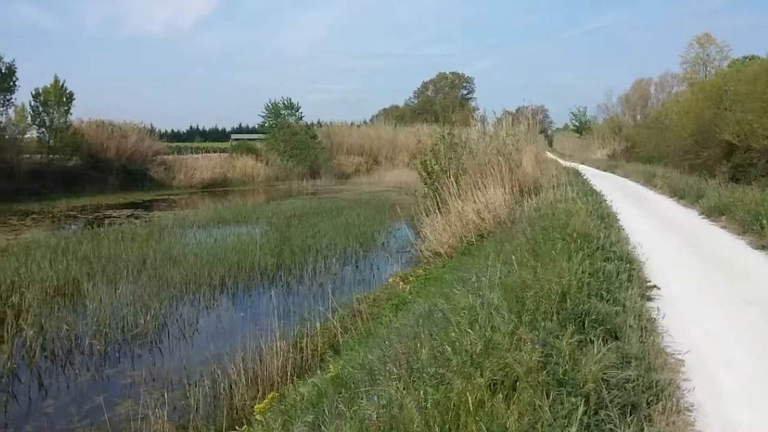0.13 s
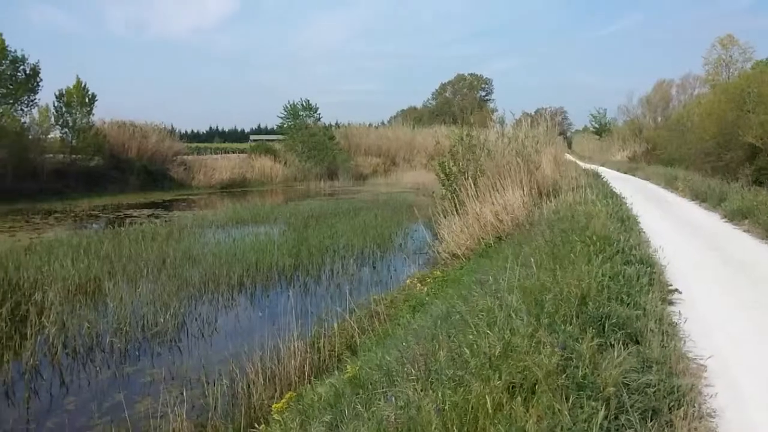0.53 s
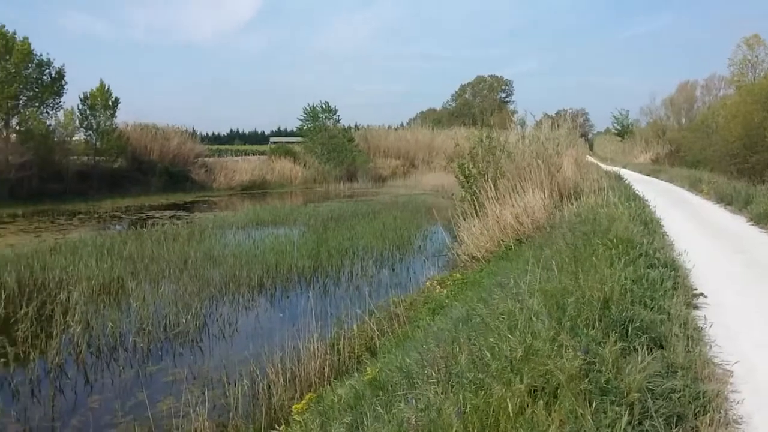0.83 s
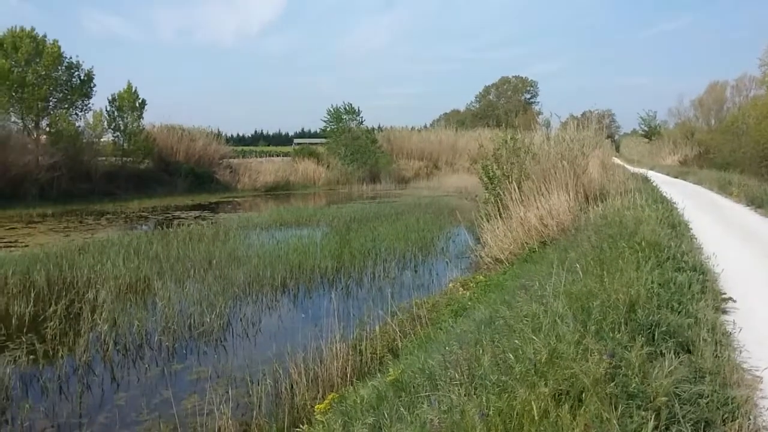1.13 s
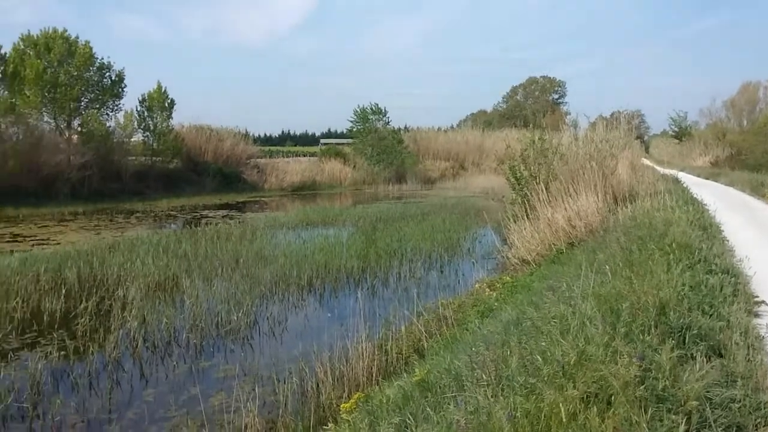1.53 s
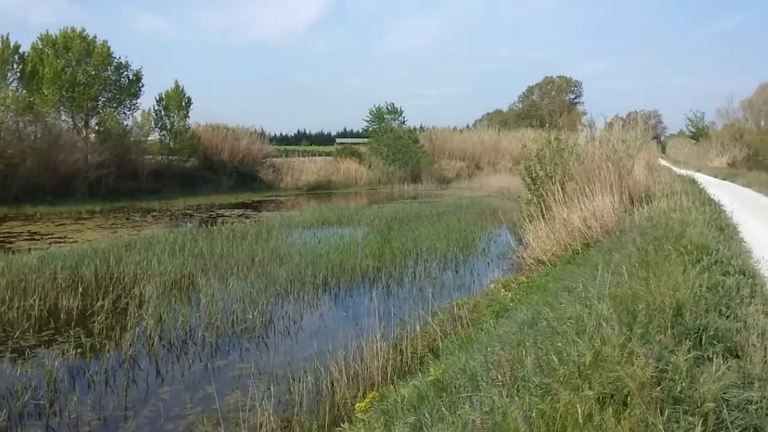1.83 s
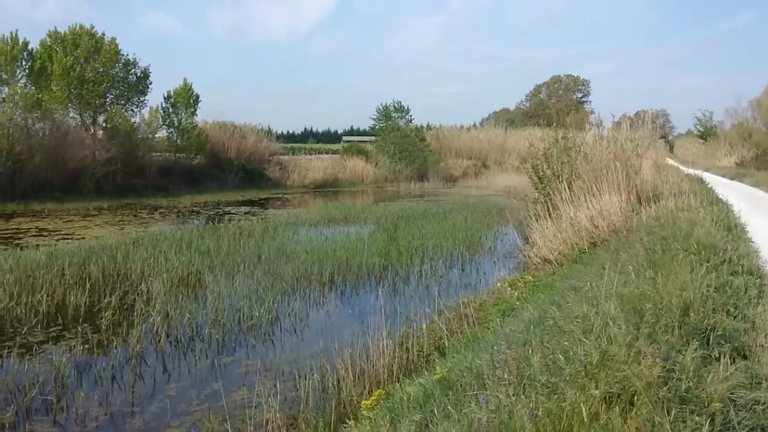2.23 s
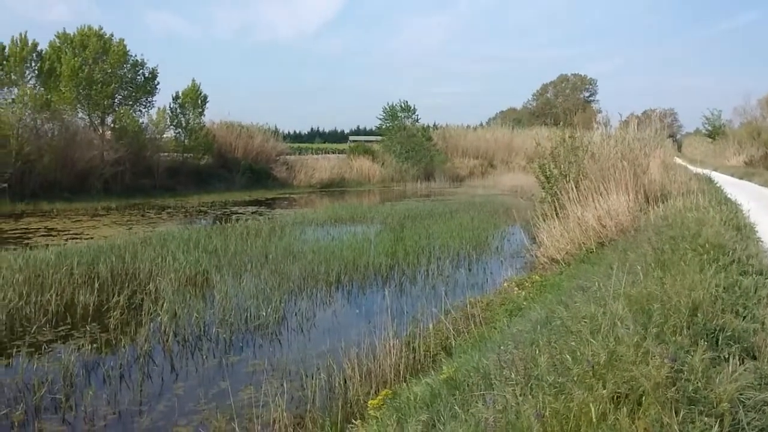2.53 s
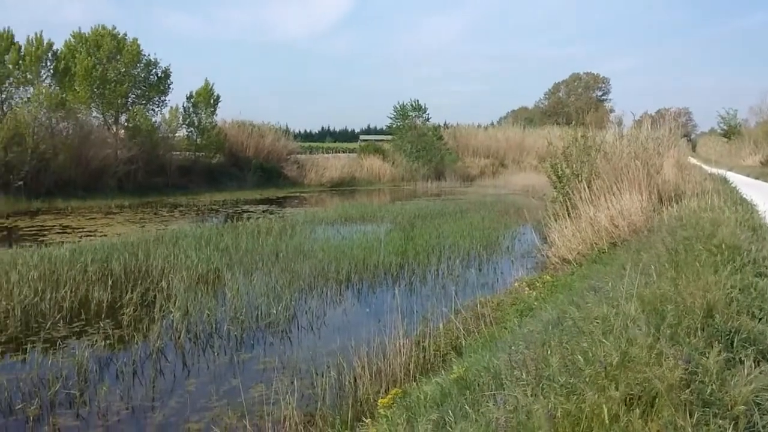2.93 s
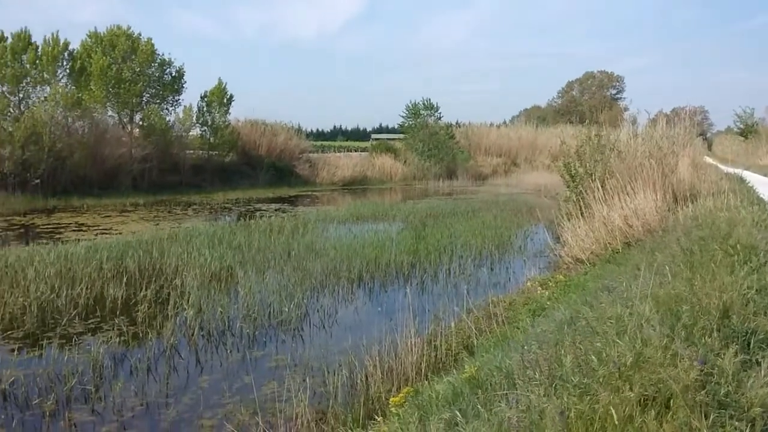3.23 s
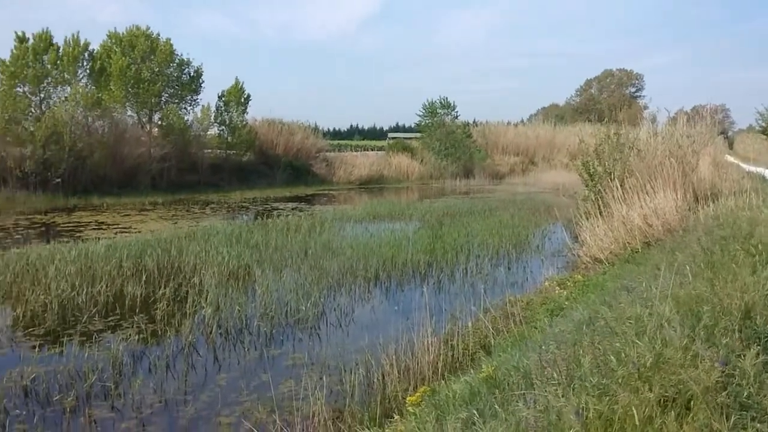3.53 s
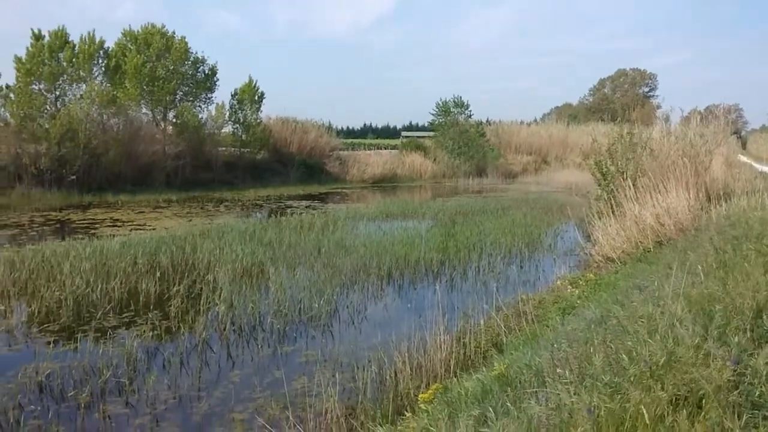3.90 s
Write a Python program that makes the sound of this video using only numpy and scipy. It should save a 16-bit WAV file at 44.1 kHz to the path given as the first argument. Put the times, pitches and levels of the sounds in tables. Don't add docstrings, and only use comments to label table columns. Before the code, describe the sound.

A four-second stereo scene at an open, reedy pond. Silence until about 0.16 s, then wind abruptly buffets the microphones with deep, lumpy thuds, different on each side, over rustling stems and faint hiss. A near frog on the right trills in quick clustered pulses, thinning at times, while a brighter, harder frog rattles evenly on the left until 1 s. Around 0.9-1.2 s a croak glides upward. From 1.25 to 2.9 s a left-hand bird repeats a short, falling, high call about five times a second, with occasional hoarse chirps; left wind thumps continue. Near 2.2 s a short low croak sounds, a distant chorus swells and a softer frog purrs, surrounding the loudest croak at 2.6 s. After 3 s the wind sinks to almost nothing; clear bird whistles appear, a last croak comes at 3.6 s, and the near trill continues to the end with tiny level dips in lulls.

```python
import sys
import numpy as np
from scipy import signal
from scipy.io import wavfile
from scipy.ndimage import uniform_filter1d

SR = 44100
rng = np.random.default_rng(int(sys.argv[2]) if len(sys.argv) > 2 else 0)


def digitize_waveform(pressure):
    field = np.atleast_2d(pressure).T
    bounded = np.clip(field, -1, 1)
    quanta = np.round(bounded * 32767).astype(np.int16)
    wavfile.write(sys.argv[1], SR, quanta)


def amplitude_ratio(level_db):
    exponent = np.asarray(level_db, float) / 20
    return 10 ** exponent


N = 179222


def in_time(rows):
    s, *columns = np.transpose(rows)
    return [np.interp(np.arange(N) / SR, s, column) for column in columns]


def at_hz(points, hz):
    points_hz, db = np.transpose(points)
    return np.interp(np.log(hz), np.log(points_hz), db)


def rms_one(x):
    return x / np.sqrt(np.mean(x ** 2, axis=-1, keepdims=True) + 1e-20)


def drift(rate):
    r = np.exp(-80 * np.pi * rate / SR)
    chance = rng.standard_normal((2, N // 40 + 1002))
    slow = rms_one(signal.lfilter([1], [1, -2 * r, r * r], chance)[:, 1000:])
    return np.array([np.interp(np.arange(N) / 40, np.arange(len(s)), s) for s in slow])


def lay(times, shapes):
    out = np.zeros(N + 2 * SR)
    starts = (np.asarray(times) * SR).astype(int)
    np.add.at(out, starts[:, None] + np.arange(shapes.shape[1]), shapes)
    return out[:N]


def pulses(times, db, hz, t60, rise_s=0.00034):
    t = np.arange(1100) / SR
    envelope = (1 - np.exp(-t / rise_s)) ** 2 * amplitude_ratio(-60 * t / t60)
    tone = np.sin(2 * np.pi * np.outer(hz * np.ones(len(times)), t))
    return lay(np.asarray(times) - .001, amplitude_ratio(np.asarray(db))[:, None] * tone * envelope / envelope.max())


def place(x, left_db, right_db, echo_db=0):
    left_lead = 21
    banks = [(.011, -16), (.017, -28), (.027, -18), (.041, -13)]   # t/s, level/dB
    echo = sum(amplitude_ratio(db + echo_db) * np.roll(x, int(s * SR)) for s, db in banks)
    return np.array([amplitude_ratio(left_db) * np.roll(x + echo, -left_lead), amplitude_ratio(right_db) * (x - echo)])


def banded_noise(spectrum, low_hz, count, patchy_db, rate, extra_db=0, slope=0):
    out, together, white = 0, drift(rate / 2), rng.standard_normal((2, 2, N))
    for k in range(count):
        low = low_hz * 2 ** (k / 2)
        high = min(low * np.sqrt(2), .45 * SR)
        band = signal.sosfilt(signal.butter(2, [low, high], "band", fs=SR, output="sos"), white[k % 2])
        flicker = patchy_db * 2 * np.tanh((together + 0.69 * drift(rate)) / 2)
        tilt = slope * (k - count / 2) * extra_db
        out = out + band * amplitude_ratio(at_hz(spectrum, low * 2 ** 0.17) + flicker + tilt)
    return out


def whistles(rows, multiple=1, gain_db=0, rough=0.75, warble_hz=30, halfway=0.506):
    out, t, (flutter, warble) = np.zeros(N), np.arange(N) / SR, drift(140)
    for s, length, start_hz, end_hz, db in rows:
        span = slice(int((s - 0.015 * length) * SR), int((s + 1.16 * length) * SR))
        u = (t[span] - s) / length
        hz = start_hz + (end_hz - start_hz) * (u + (4 * halfway - 2) * u * (1 - u))
        swell = np.sin(np.pi * np.linspace(0, 1, len(u))) ** 1.1
        turns = multiple * np.cumsum(hz + warble_hz * warble[span]) / SR
        out[span] += amplitude_ratio(db + gain_db) * swell * np.sin(2 * np.pi * turns)
    return out * (1 + rough * flutter)


# f/Hz, level/dB per Hz
AIR_COLOUR = [(2800, 6), (5000, -19), (8000, 13), (10200, -21), (11700, -7), (13200, -7), (16000, -18)]


def open_air():
    hiss = rms_one(banded_noise(AIR_COLOUR, 2900, count=5, patchy_db=-0.05, rate=48))
    return amplitude_ratio(-63.5 + np.array([[3], [-.7]])) * hiss


# t/s, level/dB
REED_LEVEL = [(.22, -48.5), (.82, -48), (1.42, -48.5), (1.62, -55.5), (2.42, -56), (3.22, -60.5),
              (3.55, -52.5), (3.72, -50), (4.0, -55.5)]
# f/Hz, level/dB per Hz
STEM_COLOUR = [(300, 1.5), (600, 5), (1000, 1.5), (1500, -11), (2200, -6)]
# f/Hz, level/dB per Hz
TIP_COLOUR = [(1500, 6), (2500, -5), (4200, 1), (5500, -15), (8000, -11.5)]


def reeds():
    stem_db, = in_time(REED_LEVEL)
    tip_db = -56.5 + 1.68 * (stem_db + 48.5)
    stems = rms_one(banded_noise(STEM_COLOUR, 323.6, count=6, patchy_db=-4.5, rate=11.8))
    tips = rms_one(banded_noise(TIP_COLOUR, 1453, count=5, patchy_db=2.0, rate=13.4))
    return amplitude_ratio(stem_db + 1.5) * stems + amplitude_ratio(tip_db + [[6], [3]]) * tips


def slaps(rows):
    s, db, hz = np.transpose(rows)
    t = np.arange(-1300, 1300) / SR
    cycles = np.outer(hz, t)
    phase = rng.uniform(0, 2 * np.pi, (2, len(s), 1))
    width = np.where(cycles < 0, .75, 1.1)
    push = np.exp(-(cycles / width) ** 2) * np.cos(2 * np.pi * (cycles - 0.21 * cycles ** 2) + phase[0])
    kink = np.exp(-((cycles + 0.31) / 0.25) ** 2) * np.cos(2 * np.pi * 1.78 * cycles + phase[1])
    kink_db = -6.0 - 3.5 * np.log2(hz / 115)
    return lay(s + t[0], amplitude_ratio(db - 3.0)[:, None] * (push + amplitude_ratio(kink_db)[:, None] * kink))


# f/Hz, level/dB per Hz
WIND_COLOUR = [(30, -31), (54, 6.5), (113, 1), (183, 1), (368, -19.5), (520, -47), (750, -87), (1200, -74)]
# t/s, level/dB
LEFT_GUSTS = [(.2, -32), (.38, -23), (.47, -38), (.58, -24), (.85, -25), (1.08, -46.5), (1.2, -18.5),
              (1.37, -39), (1.7, -19.5), (1.82, -49), (1.92, -62), (2.09, -16), (2.33, -43), (2.53, -21.5),
              (2.63, -40.5), (3.0, -45.5), (3.3, -33), (3.62, -54.5)]
RIGHT_GUSTS = [(.2, -11), (.47, -19.5), (.56, -13), (.83, -16), (1.01, -25.5), (1.13, -25.5), (1.37, -38.5),
               (1.74, -45.5), (1.81, -21.5), (2.0, -21.5), (2.27, -28), (2.45, -29.5), (2.62, -43.5),
               (2.84, -59), (2.9, -24), (3.0, -54.5), (3.35, -51.5), (3.5, -67)]
# t/s, peak level/dB, f/Hz
LEFT_SLAPS = [(0.282, -19, 102), (0.344, -4.5, 113), (0.438, -14, 109), (0.547, -10, 113), (0.619, -6, 91),
              (0.697, -5.5, 104), (0.849, -0.5, 117), (1.197, -3.5, 118), (1.226, -1.5, 161.5),
              (1.448, -4, 89.5), (1.5, -8.5, 154), (1.635, -6, 77), (1.694, -2.5, 94.6), (1.823, -4, 112),
              (1.86, 0, 113), (1.973, -11.5, 113), (2.019, -14.5, 114), (2.091, -1.5, 134),
              (2.234, -6, 118), (2.38, -15, 93), (2.497, -2.5, 121.5), (2.695, -7.5, 118), (3.112, -18, 70),
              (3.176, -12.5, 140), (3.314, -34, 88), (3.385, -22.5, 187),
              (0.804, -23, 120), (0.875, -9, 173), (0.895, -19, 178), (1.249, -8, 105), (1.304, -17.5, 158),
              (1.403, -12, 116), (1.423, -17, 104), (1.522, -8, 88), (1.582, -14, 88), (1.744, -19, 108),
              (1.932, -15, 101), (1.994, -26, 114), (2.071, -38, 99), (2.116, -21, 118), (2.144, -32, 96.5),
              (2.168, -27, 154), (2.272, -25.5, 122), (2.305, -28, 118), (2.353, -24, 106),
              (2.409, -18.5, 142), (2.437, -19, 99), (2.553, -12.5, 175), (2.577, -23, 115),
              (2.66, -24, 93), (2.761, -26.5, 116), (2.783, -29, 108), (2.871, -21, 89), (2.908, -37, 88),
              (3.028, -45, 89), (3.049, -34, 196), (3.071, -23, 125), (3.146, -27.5, 103),
              (3.293, -39, 121), (3.341, -19, 88), (3.431, -36, 113), (3.502, -31.5, 88)]
RIGHT_SLAPS = [(0.179, -8, 110), (0.207, -9, 128), (0.379, -4.5, 140), (0.477, -6.5, 167),
               (0.506, -5.5, 120), (0.57, -4.5, 304), (0.619, -4.5, 159), (0.648, -2.5, 150),
               (0.741, -6.5, 131), (0.812, -8.5, 172), (0.846, -2.5, 154), (0.933, -6, 106),
               (0.97, -10, 130), (1.118, -12.5, 165), (1.7, -15.5, 137), (1.802, -11.5, 138),
               (1.869, -12, 127), (1.96, -12.5, 186), (1.991, -9, 158), (2.223, -9.5, 142),
               (2.437, -11.5, 102), (3.092, -26, 114),
               (0.271, -11, 195), (0.295, -10.5, 128), (0.333, -14, 167), (0.361, -9, 183),
               (0.431, -31, 155), (0.685, -10, 124), (0.722, -10, 117), (0.771, -8, 177),
               (1.013, -18.5, 105), (1.032, -16.5, 140), (1.178, -12.5, 114), (1.221, -11, 93.5),
               (1.911, -16, 164), (2.019, -11.5, 127), (2.07, -8.5, 120), (2.093, -9.5, 234),
               (2.145, -12.5, 113), (2.19, -13, 113), (2.272, -30, 185), (2.293, -18.5, 195),
               (2.317, -39, 124), (2.338, -23, 169), (2.36, -17.5, 129), (2.377, -20.5, 205),
               (2.478, -14, 131), (2.509, -28, 154), (2.531, -19, 103), (2.572, -21.5, 131),
               (2.6, -32, 111), (2.625, -46, 110), (2.661, -30, 150), (2.867, -25, 173), (2.903, -29, 160),
               (3.049, -31, 138), (3.067, -27, 136), (3.333, -32, 89)]


def wind():
    db = np.array(in_time(LEFT_GUSTS) + in_time(RIGHT_GUSTS))
    gusts = banded_noise(WIND_COLOUR, 24.63, count=11, patchy_db=3.5, rate=17.9, extra_db=db + 21.5, slope=0.12)
    gusts = gusts / np.sqrt(np.mean(gusts[1, SR // 5:SR] ** 2))
    eddies = np.array([slaps(LEFT_SLAPS), slaps(RIGHT_SLAPS)])
    return amplitude_ratio(db - 3.5) * gusts + eddies


# t/s, peak level/dB
TICKS = [(1.499, -36)]


def housing_ticks():
    s, db = np.transpose(TICKS)
    low_mode = pulses(s, db, 7200, t60=.003, rise_s=.0001)
    high_mode = pulses(s, db - 4, 10500, t60=.003, rise_s=.0001)
    return place(low_mode + high_mode, 0, -12)


# t/s, level/dB
CHORUS_EFFORT = [(.22, -55), (.85, -66), (1.02, -55), (1.22, -72), (2.02, -55), (2.22, -42.5), (2.5, -43.5),
                 (3.01, -51), (3.07, -63), (3.3, -66), (3.62, -40.5), (3.82, -63), (4.0, -50.5)]


def far_chorus():
    effort_db, = in_time(CHORUS_EFFORT)
    s = (np.arange(1200) + rng.uniform(0, 1.2, 1200)) * N / SR / 1202
    hz, size_db = 1930 + 90 * rng.standard_normal(len(s)), 1.6 * rng.standard_normal(len(s))
    pulse_train = pulses(s, size_db, hz, t60=0.02, rise_s=0.0006)
    return amplitude_ratio(effort_db) * place(rms_one(pulse_train), -22.0, 0.16)


# t/s, length/s, start f/Hz, end f/Hz, peak level/dB
ACROSS_NOTES = [(2.16, 0.032, 3060, 2990, -36), (3.035, 0.024, 3376, 3310, -36),
                (3.525, 0.063, 2430, 2640, -39), (3.731, 0.053, 4020, 3970, -40.5),
                (3.813, 0.051, 3240, 3450, -36.5)]


def birds_across():
    return place(whistles(ACROSS_NOTES, rough=.3, warble_hz=20), -6, -3, echo_db=-4)


# t/s, length/s, start f/Hz, end f/Hz, peak level/dB
HOARSE_NOTES = [(.29, 0.032, 5800, 6330, -52), (.79, 0.044, 5700, 6400, -48.5),
                (1.11, 0.075, 4740, 4250, -46.5), (1.295, 0.074, 6020, 4920, -43.5),
                (2.07, 0.062, 4920, 4740, -46), (2.585, 0.074, 5520, 4990, -40.5),
                (3.245, .07, 4540, 5600, -56), (3.675, .055, 5730, 4480, -48)]


def hoarse_bird():
    upper = whistles(HOARSE_NOTES, gain_db=-3, rough=.6, warble_hz=70, halfway=.4)
    lower = whistles(HOARSE_NOTES, multiple=.94, gain_db=-8, rough=.8, warble_hz=80, halfway=.3)
    return place(upper + lower, 0, -15, echo_db=-5)


# t/s, length/s, start f/Hz, end f/Hz, peak level/dB
CLEAR_NOTES = [(3.008, 0.013, 5660, 5586, -49), (3.027, 0.011, 5683, 5470, -41),
               (3.041, 0.016, 5830, 5500, -39), (3.051, 0.0073, 5530, 4400, -41),
               (3.062, 0.013, 5340, 4900, -35.5), (3.07, 0.0084, 5010, 4200, -46),
               (3.414, 0.029, 4420, 5270, -44), (3.436, 0.012, 3900, 3200, -39),
               (3.505, 0.031, 3460, 3410, -40.5), (3.536, 0.012, 3200, 2990, -42),
               (3.675, 0.032, 3700, 3610, -51), (3.697, 0.026, 3620, 3400, -35.5),
               (3.722, .02, 3280, 2950, -47.5), (3.882, 0.043, 3670, 3100, -35)]


def clear_bird():
    notes = whistles(CLEAR_NOTES, gain_db=-1.5, rough=.2, warble_hz=20, halfway=.2)
    return place(notes, 0, -15, echo_db=-9)


# t/s, peak level/dB
CALLS = [(1.254, -50.5), (1.433, -45), (1.616, -45.5), (1.794, -46), (1.98, -43.5), (2.161, -40),
         (2.345, -38.5), (2.532, -40.5), (2.721, -40), (2.914, -41)]
# t/s from its start, pitch ratio, level/dB of the 2nd, 3rd and 4th partial
CALL_SHAPE = [(-.014, 1.04, -40, -8, -42), (0.001, 1.1, -23, 3, -23), (0.016, 1.03, -3, 5, -3),
              (0.029, 0.985, 3.5, 6.5, -1.5), (0.051, .96, -4.5, 4.5, -7), (0.056, .955, -24, 2, -9),
              (.07, .935, -20, 2, -9), (.082, 0.97, -44, -15, -30)]
# t/s, extra/s
CALL_STRETCH = [(1.8, .013), (2.4, .014), (2.72, 0)]


def falling_calls():
    top_hz, flat_hz, warms_s = 3518, 333, 0.78
    out, t, (flutter, warble) = np.zeros(N), np.arange(N) / SR, drift(110)
    upper_levels = [(1.4, -8, -22), (1.65, -19, -34), (1.9, -31, -38), (2.6, -21, -28), (2.95, -18, -13)]
    third_db, fourth_db = in_time(upper_levels)
    shape_s, ratio, *partials = np.transpose(CALL_SHAPE)
    for s, db in CALLS:
        since = shape_s + (shape_s > .04) * np.interp(s, *np.transpose(CALL_STRETCH))
        span = slice(int((s + since[0]) * SR), int((s + since[-1]) * SR))
        u = t[span] - s
        sag = 1 + 15 * np.maximum(u - .03, 0)
        hz = top_hz - flat_hz * np.exp(-(s - CALLS[0][0]) / warms_s) * sag
        bent_hz = uniform_filter1d(hz * np.interp(u, since, ratio), size=200)
        turns = np.cumsum(bent_hz + 8 * warble[span]) / SR
        for multiple, shape_db, gain_db in zip((1, 1.5, 2), partials, (0, third_db[span], fourth_db[span])):
            broken_db = 6 * (multiple - 1) * warble[span]
            level = amplitude_ratio(db + gain_db + broken_db + np.interp(u, since, shape_db))
            out[span] += level * np.sin(2 * np.pi * multiple * turns)
    return place(amplitude_ratio(1.5) * out * (1 + .15 * flutter), 0, -15, echo_db=-9)


# t/s, length/s, start f/Hz, end f/Hz, peak level/dB
LOW_TONES = [(1.77, 0.027, 1414, 1386, -49), (1.97, 0.018, 1400, 1370, -48), (2.52, 0.054, 1210, 1390, -56),
             (3.55, 0.076, 436, 493, -43.5), (3.643, 0.025, 523, 407, -41.5)]


def low_tones():
    return place(whistles(LOW_TONES, rough=0.11, warble_hz=5.0), 0.44, -0.5)


# t/s, peak level/dB on the right
PURR_SNAPS = [(2.2317, -37), (2.2361, -38), (2.2407, -31), (2.2462, -27), (2.254, -30), (2.26, -27),
              (2.266, -28), (2.272, -29), (2.2757, -35), (2.2804, -40), (2.298, -35), (2.3043, -31),
              (2.312, -34), (2.3184, -35), (2.324, -42), (2.3276, -38), (2.3325, -37), (2.3385, -39),
              (2.3437, -30.5), (2.36, -34), (2.365, -30), (2.3725, -32), (2.3773, -30), (2.382, -33),
              (2.3874, -37), (2.3935, -30), (2.3966, -35), (2.405, -35), (2.4135, -35), (2.4248, -32),
              (2.434, -30), (2.4438, -34), (2.4507, -28), (2.457, -23.5), (2.463, -37), (2.469, -38),
              (2.475, -40), (2.479, -35), (2.4836, -34), (2.4946, -26.5), (2.5039, -40), (2.5065, -40),
              (2.513, -38), (2.52, -32), (2.535, -44), (2.5483, -34),
              (2.67, -29), (2.6734, -42), (2.678, -26), (2.6816, -31), (2.6956, -43), (2.7018, -26),
             (2.7098, -29), (2.726, -31), (2.7453, -32), (2.7686, -27.5), (2.784, -33), (2.8068, -32),
             (2.8952, -39), (2.9078, -46), (2.9288, -32), (2.984, -35), (2.9987, -41), (3.006, -30)]


def purring_frog():
    s, db = np.transpose(PURR_SNAPS)
    hz = 1890 * (1 + 0.025 * rng.standard_normal(len(s)))
    return place(pulses(s, db - 5.0, hz, t60=0.0082, rise_s=0.00091), -8.5, 0)


RATTLE_GROUPS = [.184, .222, .266, .306, .348, .39, .427, .469, .507, .555, .597, .629, .673, .718, .762,
                 .803, .850, .893, .933, .986]
# f/Hz, level/dB, t60/s
RATTLE_MODES = [(2680, -1.0, .008), (3450, 0.0, .004), (4420, -3.0, .008)]


def left_frog():
    rasp_db, rasp_per_s = -46.5, 230
    s = np.array(RATTLE_GROUPS)
    db = -33 - 2.5 * ((s == s[0]) | (s == s[-1]))
    rasp = np.arange(s[0], s[-1], 1 / rasp_per_s)
    s = np.append((s[:, None] + [-.0065, 0, .0075]).ravel(), rasp)
    db = np.append((db[:, None] + [-5, -2.5, -2.5]).ravel(), rasp_db + 0 * rasp)
    chance = rng.standard_normal((400, 7))[:len(s)].T
    s = s + 0.00098 * chance[6]
    body = 0
    for (hz, gain_db, t60), size, pitch in zip(RATTLE_MODES, chance, chance[3:]):
        climb = 0.11 * (s - .55) * (hz > 4000)
        body = body + pulses(s, db + gain_db + 1.2 * size, hz * (1 + .015 * pitch + climb), t60, rise_s=0.001)
    return place(body, -4.0, -24.0)


# t/s, pulses per s, ring f/Hz, peak level/dB on the right
CROAKS = [
    [(.92, 131, 2300, -34.5), (1.01, 195, 2060, -39.5), (1.06, 212, 1850, -33.5), (1.1, 235, 1450, -33),
     (1.14, 310, 1620, -31), (1.157, 335, 1800, -27), (1.173, 307, 1770, -26.5), (1.182, 196, 1870, -33),
     (1.2, 115, 1830, -36.5)],
    [(2.545, 216, 1500, -71), (2.572, 254, 1640, -31), (2.595, 350, 1770, -26), (2.63, 320, 1890, -19),
     (2.652, 208, 1950, -23.5), (2.665, 280, 2000, -33)],
    [(3.515, 186, 1970, -37), (3.55, 222, 1670, -32), (3.59, 236, 1450, -30.5), (3.635, 290, 1670, -23),
     (3.66, 246, 1750, -27), (3.695, 127, 1780, -48)],
    [(2.228, 160, 1400, -33), (2.25, 120, 1340, -35), (2.27, 123, 1410, -28.5), (2.33, 115, 1470, -49)],
]
# throat level/dB, left port level/dB
CROAKERS = [(-5, 0), (-9.5, -2), (-4.5, 0.5), (-1, 0)]


def croakers():
    out = 0
    for rows, (throat_db, left_db) in zip(CROAKS, CROAKERS):
        s, per_s, hz, db = np.transpose(rows)
        t = np.arange(s[0], s[-1], 1 / SR)
        pulse_count = np.floor(np.cumsum(np.interp(t, s, per_s)) / SR)
        beats = t[1:][np.diff(pulse_count) > 0]
        wobble = rng.standard_normal((90, 4))[:len(beats)]
        beats = beats + .00005 * wobble[:, 0]
        level = np.interp(beats, s, db) + .8 * wobble[:, 1]
        ring = np.interp(beats, s, hz) * (1 + .006 * wobble[:, 2])
        throat_hz = 963 * (1 + 0.2 * np.tanh(wobble[:, 3]))
        upper = pulses(beats, level, ring, t60=0.008, rise_s=.0006)
        upper = upper + pulses(beats, level - 15, 1.67 * ring, t60=0.002)
        throat = pulses(beats, level + throat_db, throat_hz, t60=0.02)
        lower = pulses(beats, level - 1.5, 0.92 * ring, t60=0.009, rise_s=.0006) + throat
        out = out + place(upper, left_db - 11, -1.5, echo_db=-12) + place(lower, left_db - 8, -14, echo_db=-8)
    return out


def trill_pulses(rows, count):
    run_up_ms, quicker_ms, build_db, opening_loss_db = 6.6, 0.81, 2, 1.5
    s, db, gap_ms = np.transpose(rows)[:, :, None]
    back = np.arange(count)
    before_ms = (back > 0) * gap_ms + np.maximum(back - 1, 0) * run_up_ms - (back > 2) * quicker_ms
    loss_db = build_db * back + opening_loss_db * back * (back == count - 1)
    s, db = s - before_ms / 1000, db - loss_db
    lead_s = s[:, -1] - np.array([[5.8], [11.5]]) / 1000
    lead_db = db[:, -1] + np.array([[-9], [-16]])
    return np.array([np.append(s, lead_s), np.append(db, lead_db)])


# t/s, ring f/Hz
SAC_RING = [(.2, 2100), (.38, 2124), (.45, 1880), (.63, 1840), (1.45, 1890), (1.8, 2080), (2.0, 2204),
            (2.1, 2066), (2.2, 1846), (2.95, 1940), (3.2, 1840), (3.35, 2030), (3.5, 2260), (4.06, 2270)]
# last pulse t/s, peak level/dB on the right, gap before it/ms
SINGLES = [(.566, -32, 0), (.631, -37.5, 0), (1.4856, -35, 0), (1.5338, -34.5, 0), (1.552, -37, 0),
           (3.18, -48, 0), (1.9363, -41, 0), (2.935, -30.5, 0), (3.2892, -40.5, 0)]
PAIRS = [(.1943, -32.5, 8.8), (.2063, -30.5, 5.8), (.217, -30, 2.2), (.231, -29.5, 5.9), (1.601, -31, 13),
         (1.645, -31.5, 8.6), (1.7004, -30, 10), (1.755, -30, 8.4), (1.918, -26.5, 7.5), (2.1927, -33, 11),
         (2.8667, -30.5, 8.6), (2.906, -36, 10.6), (3.239, -39, 11), (3.3392, -37, 9.7), (3.399, -31, 13.5),
         (3.4454, -29, 8.9), (3.497, -31, 9.5), (3.556, -26.5, 7.8), (3.61, -27, 8.2), (3.72, -26.5, 9.8),
         (3.83, -28, 8.2), (4.0566, -27.5, 7.9)]
TRIPLETS = [(0.175, -36, 9.4), (0.2712, -27, 11), (0.328, -26.5, 13.2), (0.4327, -26.5, 6.3),
            (0.4937, -29.5, 8.8), (0.5503, -33, 6.6), (0.608, -31.5, 6.6), (1.817, -28, 12.8),
            (1.8724, -26.5, 9.2), (1.9756, -27, 9), (2.2117, -25.5, 6.5), (3.015, -41, 14),
            (3.6723, -26, 14), (3.776, -27.5, 6.9), (3.904, -27.5, 19), (4.003, -27, 7.6)]
QUADS = [(0.381, -27, 10.2), (2.0371, -24.5, 10), (2.0972, -24.5, 10.6), (2.159, -25, 9.9),
         (2.9787, -27.5, 9.6), (3.9506, -24.5, 9.6)]


def near_frog():
    groups = (SINGLES, PAIRS, TRIPLETS, QUADS)
    s, db = np.hstack([trill_pulses(rows, count=k + 1) for k, rows in enumerate(groups)])
    hz = np.interp(s, *np.transpose(SAC_RING)) * (1 + 0.0061 * rng.standard_normal(len(s)))
    body = pulses(s, db + 1.5, hz, t60=.0105, rise_s=.0008)
    knock = pulses(s, db - 32.0, 513, t60=0.082, rise_s=0.004)
    overtone_db = 6 * abs(s - 2)
    overtone = pulses(s, db - 24 + overtone_db, 5040, t60=0.01)
    slack = pulses(s, db + (1900 - hz) / 10, .9 * hz, t60=.0105)
    return place(body + knock, -11.5, 0, echo_db=-4.0) + place(overtone, 0, -25) + place(slack, -12.0, -38.0)


def scene():
    background = open_air() + reeds() + wind() + housing_ticks() + far_chorus()
    birds = birds_across() + hoarse_bird() + clear_bird() + falling_calls()
    frogs = low_tones() + purring_frog() + left_frog() + croakers() + near_frog()
    return background + birds + frogs


# t/s, depth/dB, width/s
DUCKS = [(2.837, 9.5, 0.044), (3.263, 13.5, 0.046), (3.81, 17, 0.022), (3.928, 6.5, 0.014),
         (3.976, 10, 0.014), (4.037, 14.5, 0.02)]


def noise_gate(x):
    t = np.arange(N) / SR
    duck_db = sum(depth * np.exp(-(2 * (t - s) / width) ** 2) for s, depth, width in DUCKS)
    return x * amplitude_ratio(-duck_db)


def top_cut(x):
    return signal.sosfilt(signal.butter(12, 16360, fs=SR, output="sos"), x)


def record(dry):
    start_s, fade_s = .1595, 0.00018
    cut = signal.sosfilt(signal.butter(4, 52, "high", fs=SR, output="sos"), dry)
    top = signal.sosfilt(signal.cheby2(16, 40, 15900, fs=SR, output="sos"), cut)
    opening = np.clip((np.arange(N) / SR - start_s) / fade_s, 0, 1)
    return top_cut(noise_gate(top) * opening)


dry = scene()
out = record(dry)
digitize_waveform(out)
```